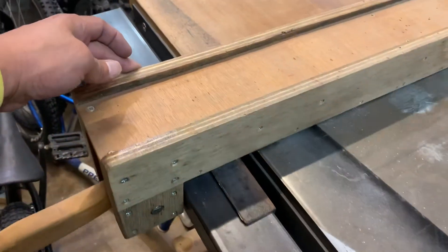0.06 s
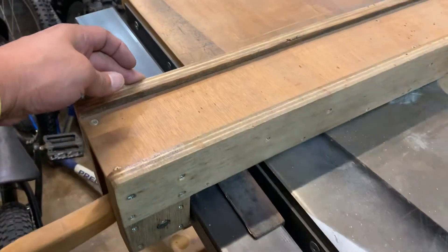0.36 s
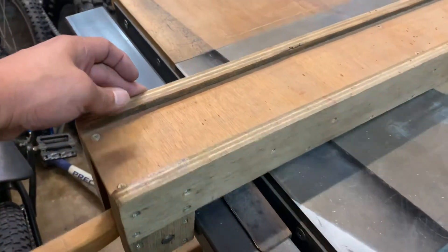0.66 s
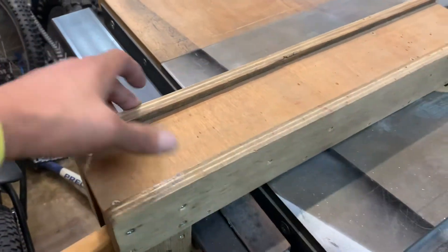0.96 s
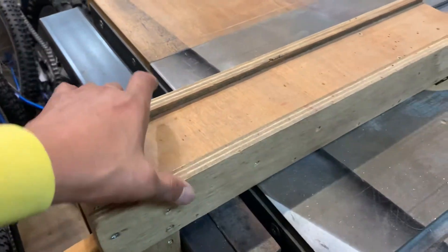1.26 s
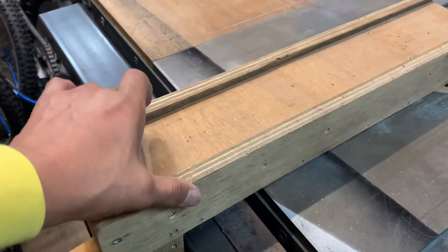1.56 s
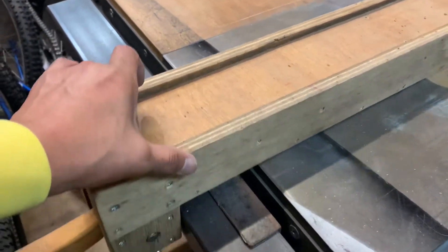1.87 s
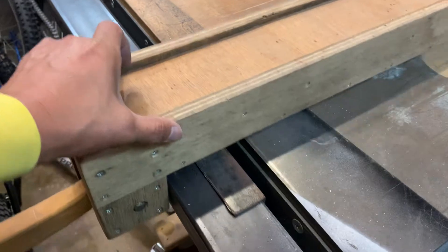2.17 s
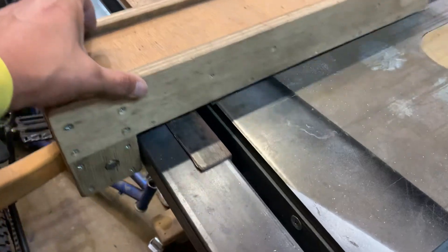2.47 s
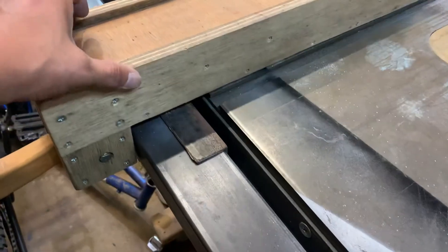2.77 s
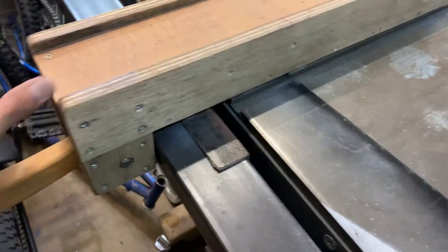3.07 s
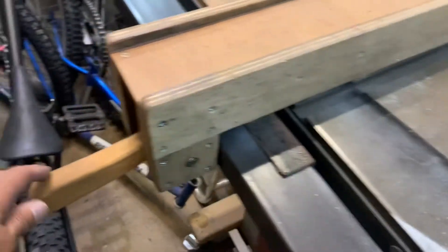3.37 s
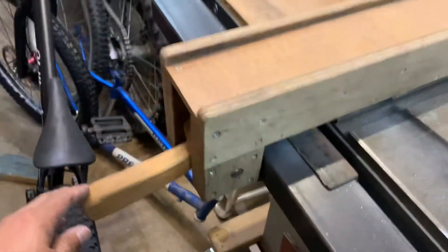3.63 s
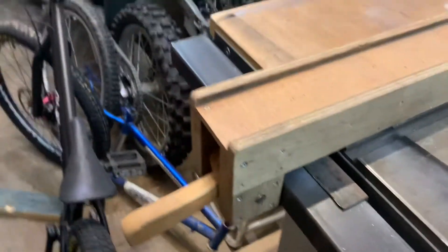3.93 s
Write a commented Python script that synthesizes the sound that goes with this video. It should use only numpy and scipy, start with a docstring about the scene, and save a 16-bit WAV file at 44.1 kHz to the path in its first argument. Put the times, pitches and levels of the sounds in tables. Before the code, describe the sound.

Wood slides on metal with a hissing rub and one hollow knock, over a hum.

```python
"""In a small workshop a wooden saw fence is pushed along its steel rail, hissing and rubbing as it goes.
At about one second it is gripped anew with a knock: a hard clack and a hollow, boxy thump.
After a short pause it is drawn back, stirring one resonance of box and rail after another.
Near the end the hand brushes the wooden clamp lever twice. An engine-like drone runs under it all."""
import sys
import numpy as np
from scipy import signal
from scipy.fft import rfft, irfft
from scipy.io import wavfile

SR = 44100
rng = np.random.default_rng(int(sys.argv[2]) if len(sys.argv) > 2 else 0)


def waveform_to_disk(signal):
    """Save audio, clipped to [-1, 1], as 16-bit WAV at the path in sys.argv[1]."""
    frames = np.transpose(np.atleast_2d(signal))
    scaled = np.clip(frames, -1, 1) * 32767
    samples = np.round(scaled).astype(np.int16)
    wavfile.write(sys.argv[1], SR, samples)


N = 176400
T = np.arange(N) / SR
HZ = np.maximum(np.arange(N // 2 + 1) * SR / N, 1)
SIDES = np.array([[-1], [1]])   # left, right
RING_Q = 27   # centre over width of a rubbed resonance


def slide():
    """Wood on steel: the hiss follows the speed, while the rub levels off and chatters."""
    # The push and the draw back. Each row: time in seconds, speed as a level in dB.
    stroke = [(0,4),(.2,-1.5),(.42,-0.5),(.52,-4.5),(.68,3.5),(.76,-3.5),(.87,-24.5),(.925,-3.5),(.985,3.5),(1.03,-29),(1.44,-37),(1.52,-14),(1.61,-4),(1.69,-3),(1.83,-10),(1.93,-4),(2.1,-3.5),(2.29,4.5),(2.44,0),(2.55,-9),(2.64,-11),(2.72,-28)]
    # Hiss of the sliding faces. Each row: frequency in Hz, density in dB per Hz.
    hiss_colour = [(2500,-102),(4200,-89.5),(5500,-89.5),(8400,-84),(10000,-89.5),(12000,-91.5),(15700,-96.5)]
    # The wood's darker rub. Each row: frequency in Hz, density in dB per Hz.
    rub_colour = [(150,-89),(400,-74.5),(1000,-75.5),(1750,-76.5),(2400,-81.5),(2800,-85.5),(4500,-87),(9000,-110)]
    knee_db, chatter_db, pan_db, pan_hz = -1, 1, 3, 4650
    speed = from_db(np.interp(T, *np.transpose(stroke)))
    hiss = speed * friction(hiss_colour, grain_db=0.82, grain_rate=67, patchy_db=1.0)
    hiss += resonate(hiss, pan_hz, pan_hz / 2) * (from_db(pan_db * SIDES) - 1)   # this band leans right
    drive = speed / np.hypot(speed, from_db(knee_db))
    chatter = from_db(chatter_db * drift(21))   # uneven stick and slip
    return hiss + rail_rings() + drive * chatter * shifting_rub(rub_colour)


def shifting_rub(spectrum):
    """Five differently coloured rubs take over from one another at constant power."""
    shares = np.exp([drift(9.6) for _ in range(5)])
    shares /= np.sqrt((shares ** 2).sum(axis=0))
    return sum(share * noise(spectrum, ripple_db=6) for share in shares)


def rail_rings():
    """Tiny slips stir resonances of box and rail, each swelling as the contact passes."""
    # Each row: peak time in seconds, half length in seconds, pitch in Hz, peak density in dB per Hz.
    rings = [(0.077,0.084,1000,-66.5),(0.533,0.12,2290,-73),(.615,0.026,810,-61),(0.673,0.087,1130,-71),(0.69,.05,1370,-64),(1.68,0.068,2110,-72),(1.676,0.15,1460,-70.5),(1.916,0.074,2080,-68),(2.17,0.13,2150,-70.5),(2.273,0.12,655,-59.5),(2.342,.19,1500,-67.5)]
    slips = noise([(1, 0)], ripple_db=0)   # white
    return sum(from_db(db) * resonate(slips * swell(peak, half), hz, hz / RING_Q)
               for peak, half, hz, db in rings)


def knock():
    """A hard clack with a tick, then the hollow box thumps and settles while the room dies away."""
    # Wood meets rail, a graze and then the hit. Each row: start in seconds, level in dB.
    touches = [(0.9774,-15.5),(0.9818,-1)]
    # Modes of the hard contact. Each row: pitch in Hz, level in dB, seconds to fall by 60 dB.
    clack_modes = [(810,-13,0.012),(930,-3,0.014),(1300,-5,0.019),(1860,-14.5,0.039),(2360,-22,0.055),(2730,-27.5,0.077)]
    # The contact's bright tick. Each row: frequency in Hz, density in dB per Hz.
    tick_colour = [(2000,-87),(4500,-68),(8500,-75),(15500,-83)]
    # The fence is knocked and settles. Each row: start in seconds, level in dB, brightness in Hz.
    bumps = [(0.9878,5.5,900),(0.9946,-15.5,700),(1.0097,-12,900)]
    # Modes of the hollow wooden box. Each row: pitch in Hz, level in dB, seconds to fall by 60 dB.
    box_modes = [(81,-25,0.49),(122.7,-21.5,0.19),(179.7,-18,0.078),(277,-14,0.063),(373,-14.5,0.13),(461,-19.5,0.11),(697,-35,0.058),(968,-29,0.15),(1105,-23,.1),(1437,-25,0.074),(1608,-27,0.15)]
    tick_decay_s, pan_db = 0.0017, 1.1
    hit = touches[-1][0]
    age = np.maximum(T - hit, 0)
    clack = sum(from_db(db) * strike(clack_modes, start, bright_hz=9000) for start, db in touches)
    tick = noise(tick_colour) * (T > hit) * np.exp(-age / tick_decay_s)
    thump = sum(from_db(db) * strike(box_modes, start, bright_hz) for start, db, bright_hz in bumps)
    return (clack + tick + thump + room_tail(age)) * from_db(pan_db * SIDES)


def strike(modes, start, bright_hz):
    """One blow rings a set of modes; a soft contact misses the high ones."""
    spread_rad, wide_hz, attack_limit_hz = 0.66, 250, 1100
    age = np.maximum(T[:SR * 2] - start, 0)
    out = np.zeros((2, N))
    for k, (hz, db, t60) in enumerate(modes):
        phase = spread_rad * hz / (hz + wide_hz) * (-1) ** k * SIDES   # higher modes sound wider
        attack = 1 - np.exp(-(4 * np.minimum(hz, attack_limit_hz) * age) ** 2)
        fade = from_db(db - 60 * age / t60) / np.hypot(1, hz / bright_hz)
        out[:, :len(age)] += attack * fade * np.sin(2 * np.pi * hz * age - phase)
    return out


def room_tail(age):
    """The small room answers the knock with a short wash in which the bass lingers longest."""
    # Colour of the tail. Each row: frequency in Hz, density in dB per Hz.
    tail_colour = [(60,-82),(150,-42),(700,-46.5),(1300,-50.5),(2000,-57.5),(2800,-68.5),(4000,-75.5),(15000,-100)]
    # The room's decay. Each row: frequency in Hz, seconds to fall by 60 dB.
    decay = [(100,0.37),(500,0.19),(1500,0.22),(3000,.18),(10000,0.21)]
    rise_s = 0.003
    tail = sum(band * from_db(-60 * age / at_hz(decay, hz)) for hz, band in octaves(noise(tail_colour)))
    return tail * (1 - np.exp(-age / rise_s))


def lever_brushes():
    """Skin rubs on wood in short swells and stirs a resonance of the clamp lever."""
    # The hand's passes. Each row: peak time in seconds, level in dB, half length in seconds.
    passes = [(3.637,0.5,0.044),(3.873,-7.5,0.03)]
    # Skin on wood. Each row: frequency in Hz, density in dB per Hz.
    skin_colour = [(1100,-74.5),(1600,-79.5),(2700,-84.5),(4300,-84.5),(8000,-92.5),(15500,-101)]
    lever_hz, lever_db = 2060, 7
    level = sum(from_db(db) * swell(peak, half) for peak, db, half in passes)
    rub = level * friction(skin_colour, grain_db=1.2, grain_rate=150, patchy_db=0.8)
    return rub + from_db(lever_db) * resonate(rub, lever_hz, lever_hz / RING_Q)


def drone():
    """An engine-like hum over throbbing air: harmonics of a turning rate, the high ones wide and shaky."""
    # Body of the hum. Each row: multiple of the turning rate, level in dB.
    harmonics = [(2, -34), (3, -40), (4, -43), (5, -40.5), (6, -47.5), (8, -45), (9, -44.5), (10, -45),
                 (11, -45), (13, -49.5), (16, -54), (17, -55), (21, -50), (23, -51.5), (25, -53),
                 (26, -51.5), (27, -58.5), (31, -55), (34, -61.5), (36, -55), (41, -64)]
    # The middle overtones dip and recover. Each row: time in seconds, gain in dB.
    mid_ride = [(0,-2),(1.3,-8),(3.1,-3),(3.8,0)]
    # Room air. Each row: frequency in Hz, density in dB per Hz.
    air_colour = [(30,-75),(60,-72),(250,-66.5),(420,-73.5),(600,-74.5),(1000,-82),(1550,-83),(1880,-87),(3100,-92),(3700,-99),(9300,-109),(12200,-105)]
    turn_hz, wander, flutter_depth, throb_depth = 25.45, 0.001, 0.146, 0.053
    upper_db, tilt_db_per_octave, scatter_db = -75.5, 3, 6.5
    mid_from_hz, mid_to_hz, wide_hz, spread_rad = 380, 950, 540, 1.4
    turn = 2 * np.pi * np.cumsum(turn_hz * (1 + wander * drift(2.4))) / SR
    upper = np.arange(32, 58)   # faint, uneven harmonics on top
    upper_levels = upper_db + tilt_db_per_octave * np.log2(upper / upper[0])
    upper_levels += scatter_db * rng.standard_normal(len(upper))
    flutters = [drift(9.9) for _ in range(7)]
    mid_gain = from_db(np.interp(T, *np.transpose(mid_ride)))
    hum = np.zeros((2, N))
    for i, (multiple, db) in enumerate([*harmonics, *zip(upper, upper_levels)]):
        hz = multiple * turn_hz
        height = hz / (hz + wide_hz)
        phase = rng.uniform(0, 2 * np.pi) - SIDES * height * rng.choice([-1, 1]) * spread_rad
        level = from_db(db) * (1 + flutter_depth * height * flutters[i % len(flutters)])
        if mid_from_hz < hz < mid_to_hz:
            level *= mid_gain
        hum += np.sqrt(2) * level * np.sin(multiple * turn + phase)
    return hum + noise(air_colour) * (1 + throb_depth * np.sin(turn))


def friction(spectrum, grain_db, grain_rate, patchy_db):
    """Countless tiny slips: a shared fine grain, and bands that swell as the contact patches change."""
    bands = sum(band * from_db(patchy_db * drift(15)) for _, band in octaves(noise(spectrum)))
    return bands * from_db(grain_db * drift(grain_rate))


def noise(spectrum, ripple_db=2.5):
    """Stereo noise of a given colour, rippled by the many close modes of wood and room."""
    # How alike the two sides sound. Each row: frequency in Hz, left-right correlation.
    likeness = [(60,1),(250,0.38),(600,0.068),(5500,0.054),(8500,1)]
    ripple_step_hz, lag_s, lag_from_hz = 44.98, 0.000218, 5500
    mid, side = rfft(rng.standard_normal((2, N)))
    alike = at_hz(likeness, HZ)
    mid_ripple, side_ripple = [from_db(ripple_db * np.interp(HZ / ripple_step_hz, np.arange(4000), steps))
                               for steps in rng.standard_normal((2, 4000))]
    pair = np.sqrt(1 + alike) * mid * mid_ripple - SIDES * np.sqrt(1 - alike) * side * side_ripple
    pair[0] *= np.exp(-2j * np.pi * HZ * lag_s * (HZ > lag_from_hz))   # treble reaches the left later
    return irfft(pair * from_db(at_hz(spectrum, HZ)), N) * np.sqrt(SR) / 2


def octaves(x):
    """Overlapping octave bands that sum to the whole, each paired with its centre in Hz."""
    centres, whole = np.geomspace(62.5, 16000, 9), rfft(x)
    weights = [np.interp(np.log(HZ), np.log(centres), row) for row in np.eye(len(centres))]
    return [(hz, irfft(whole * weight, N)) for hz, weight in zip(centres, weights)]


def resonate(x, hz, width_hz):
    """A resonance with gain 1 at its peak."""
    radius = np.exp(-np.pi * width_hz / SR)
    feedback = [1, -2 * radius * np.cos(2 * np.pi * hz / SR), radius ** 2]
    return signal.lfilter(np.array([1, 0, -1]) * (1 - radius ** 2) / 2, feedback, x)


def swell(peak_s, half_s):
    """A smooth rise and fall around one moment."""
    return 1 / np.cosh(np.clip((T - peak_s) / half_s * 1.4, -20, 20))


def drift(rate_hz):
    """A smooth random wobble with spread 1, mostly slower than the given rate."""
    slow = irfft(rfft(rng.standard_normal(N)) / (1 + (HZ / rate_hz) ** 2), N)
    return (slow - slow.mean()) / slow.std()


def at_hz(points, hz):
    """Read a curve on a log-frequency axis."""
    frequencies, values = np.transpose(points)
    return np.interp(np.log(hz), np.log(frequencies), values)


def from_db(db):
    """Decibels to gain."""
    return 10 ** (np.asarray(db) / 20)


def scene():
    """Fence and hand in front, the drone behind."""
    return slide() + knock() + lever_brushes() + drone()


def record(dry):
    """A steep low-pass takes off the very top."""
    cutoff_hz = 15750
    return signal.sosfilt(signal.ellip(10, 0.1, 90, cutoff_hz, fs=SR, output="sos"), dry)


dry = scene()
out = record(dry)
waveform_to_disk(out)
```